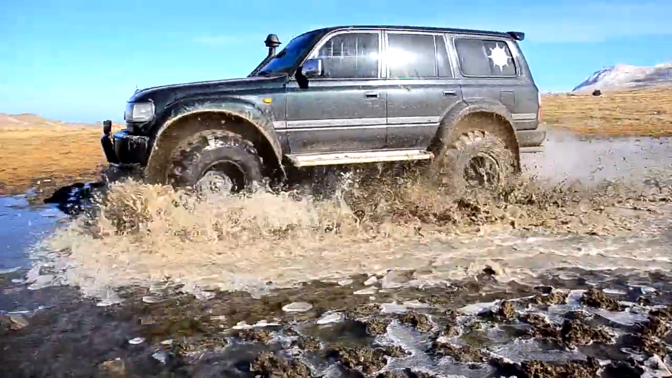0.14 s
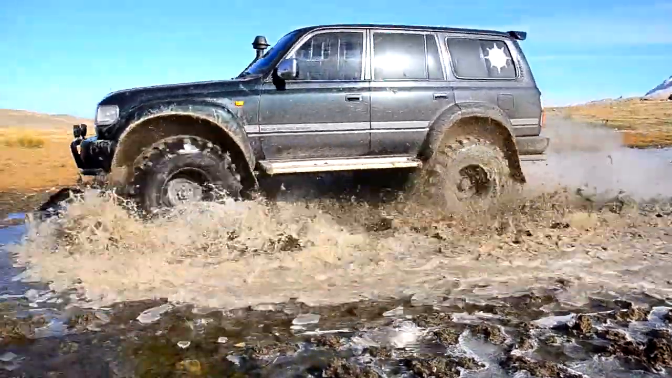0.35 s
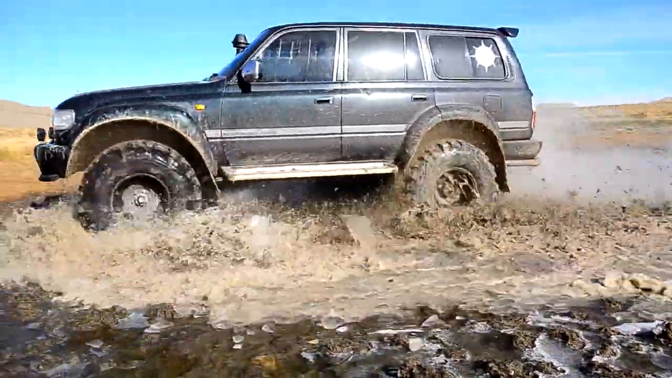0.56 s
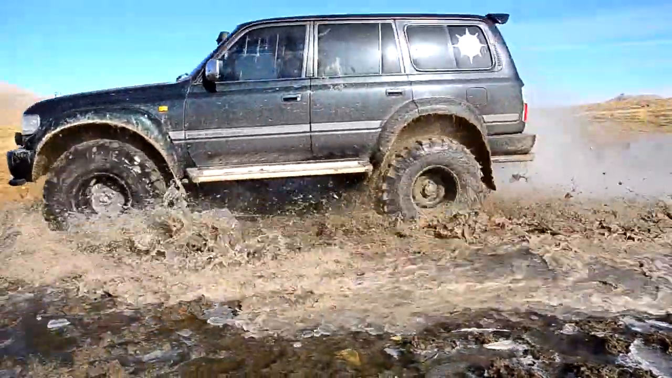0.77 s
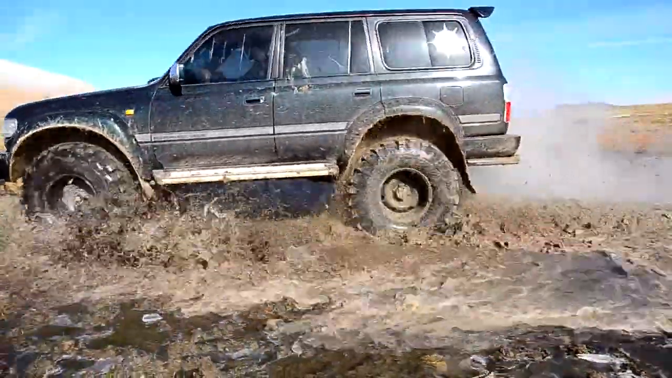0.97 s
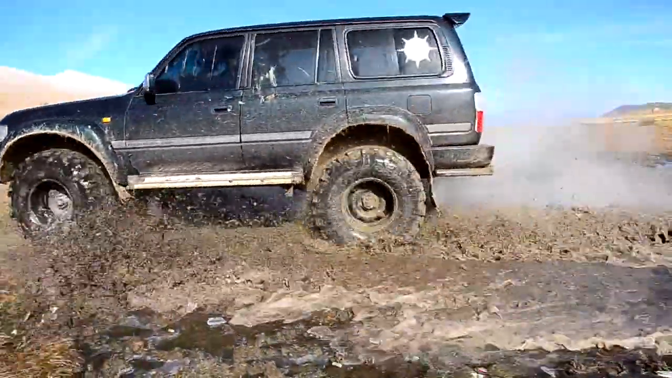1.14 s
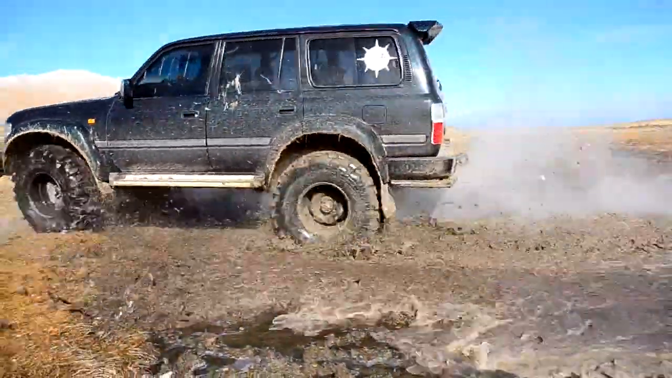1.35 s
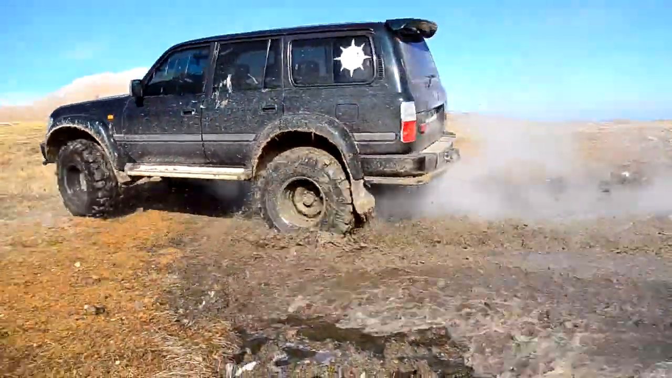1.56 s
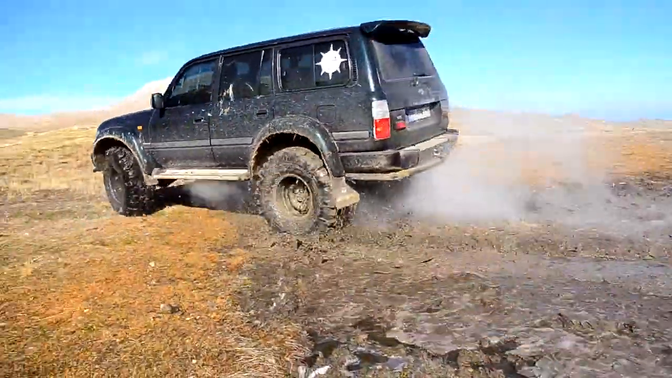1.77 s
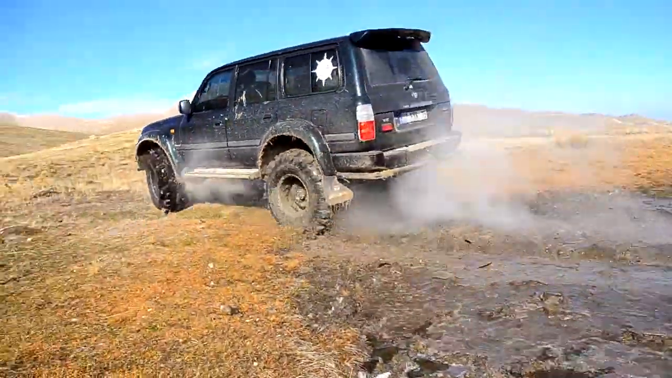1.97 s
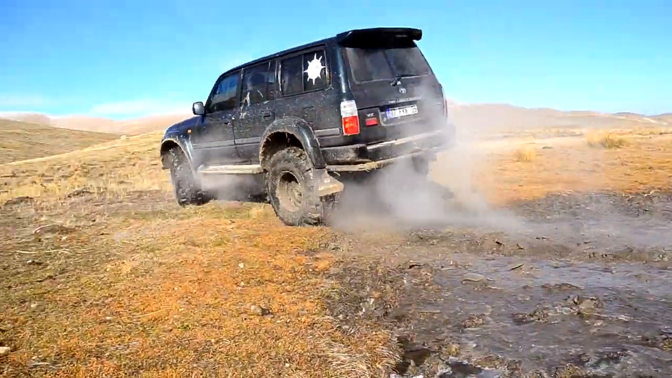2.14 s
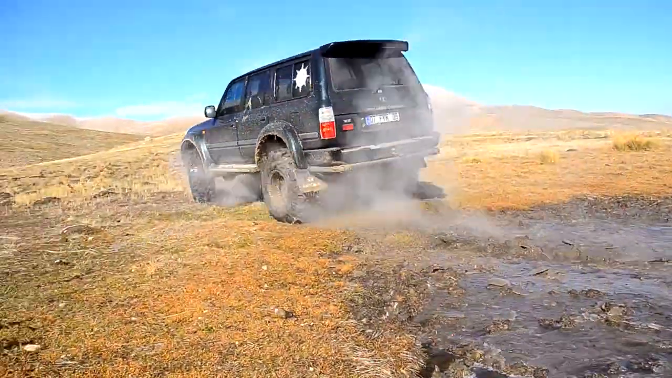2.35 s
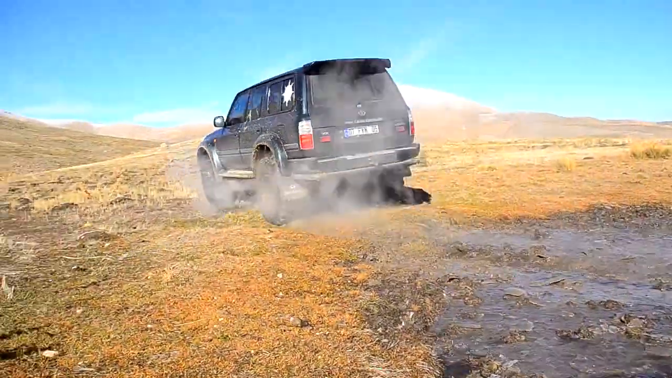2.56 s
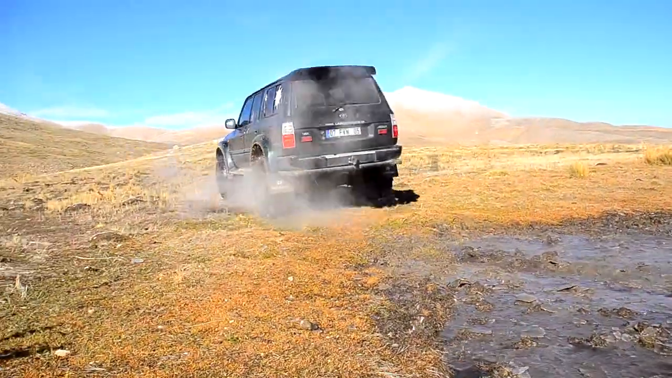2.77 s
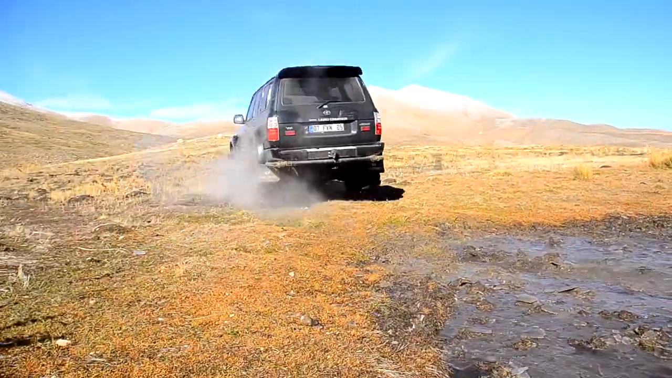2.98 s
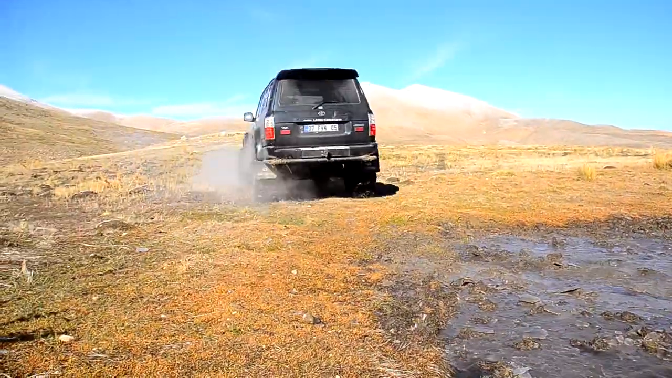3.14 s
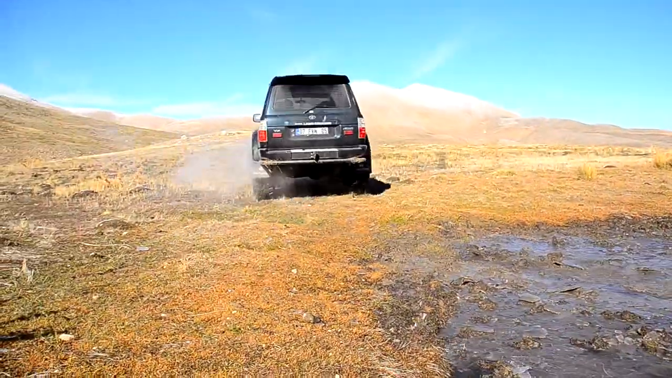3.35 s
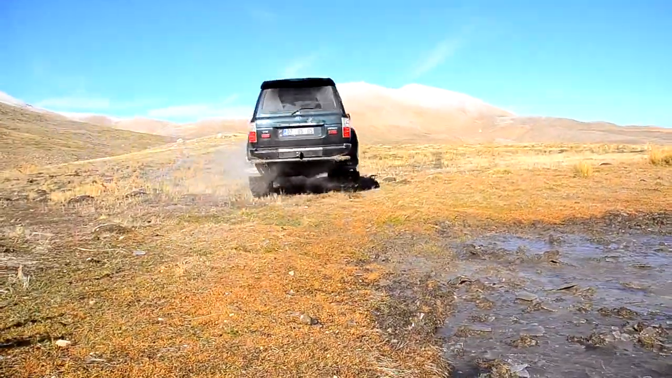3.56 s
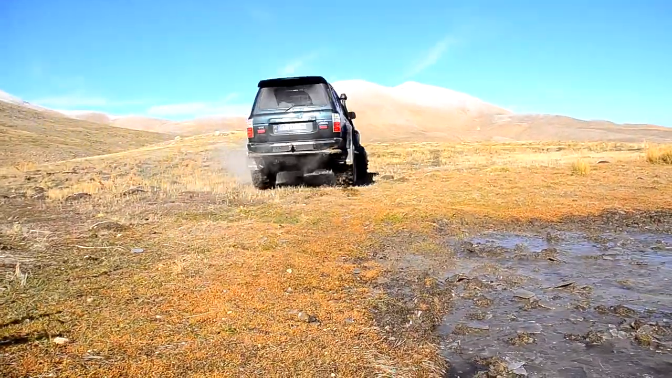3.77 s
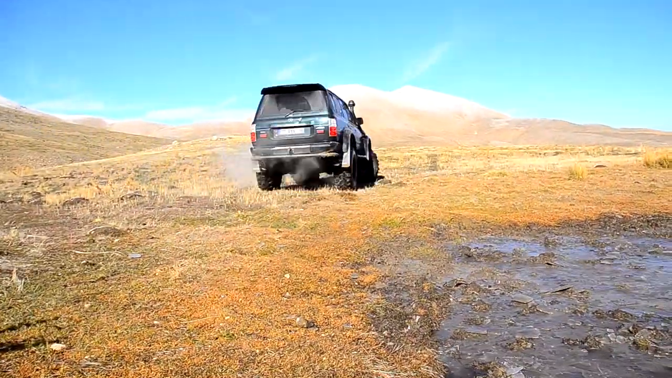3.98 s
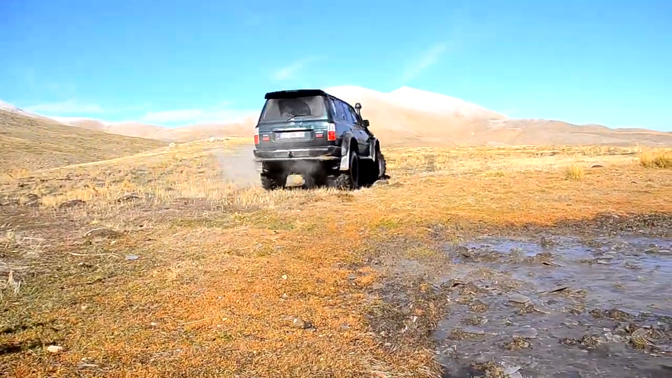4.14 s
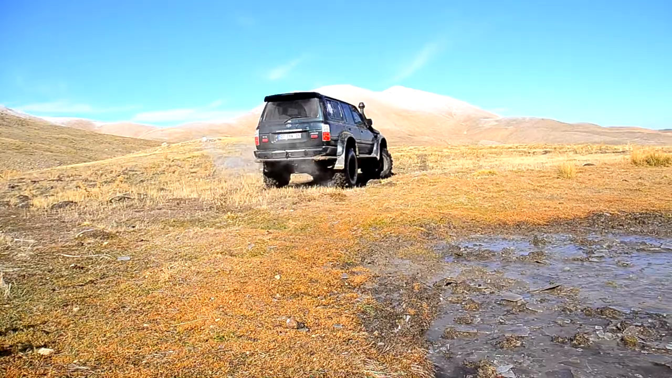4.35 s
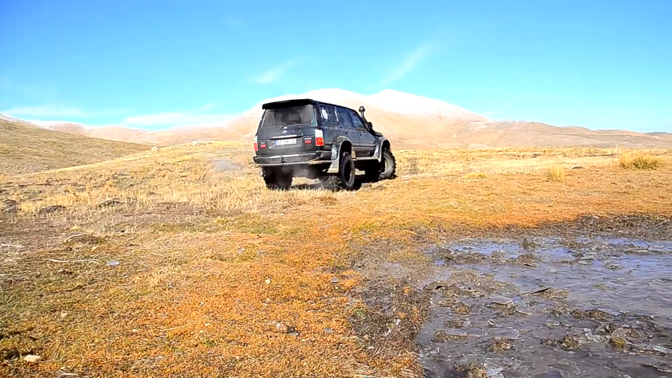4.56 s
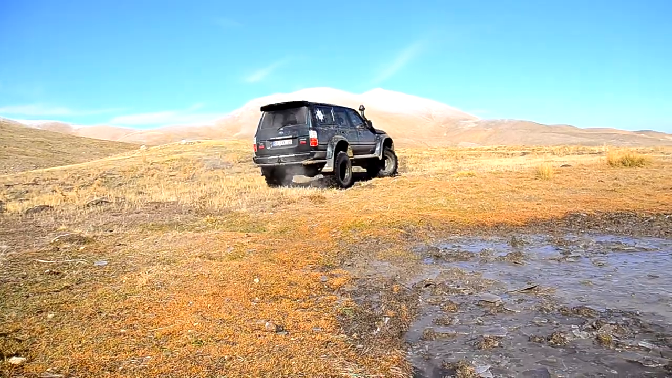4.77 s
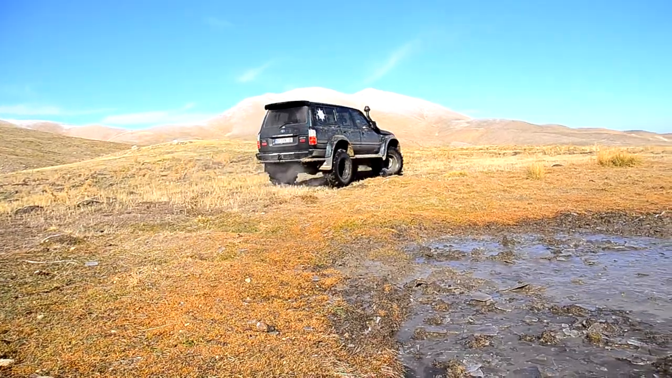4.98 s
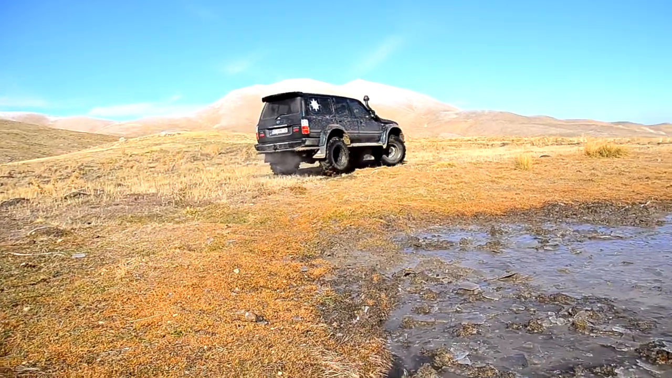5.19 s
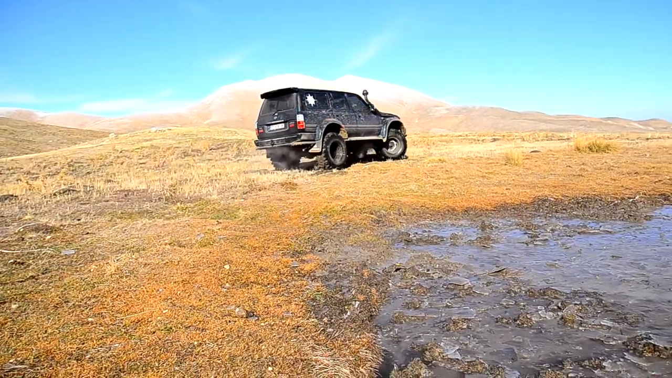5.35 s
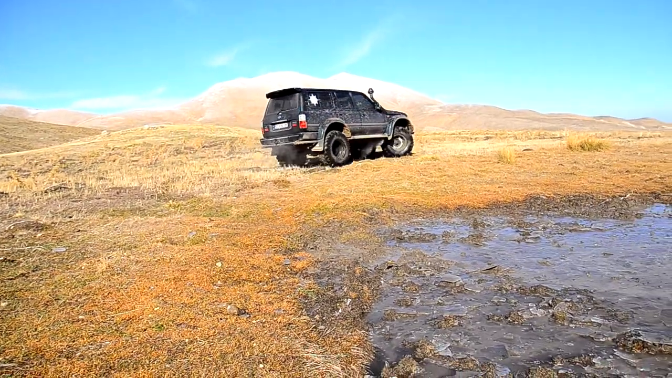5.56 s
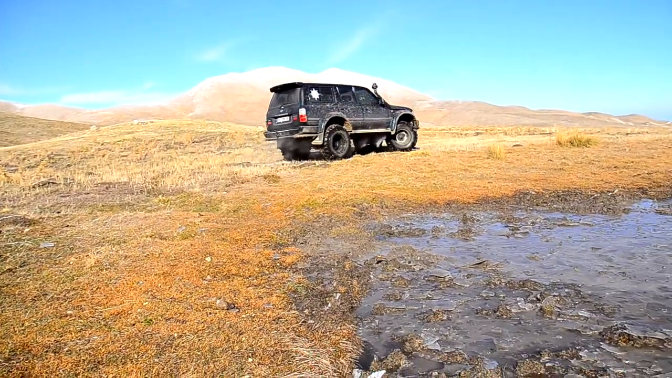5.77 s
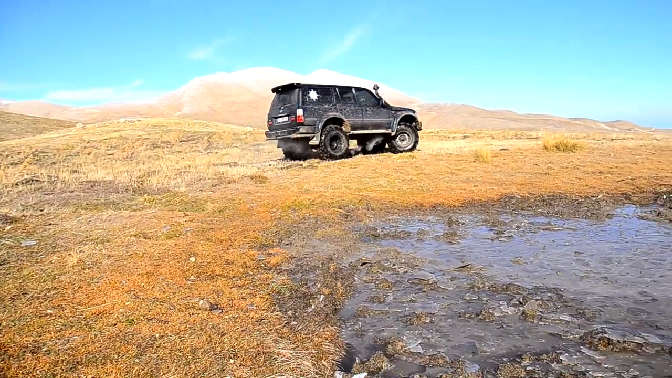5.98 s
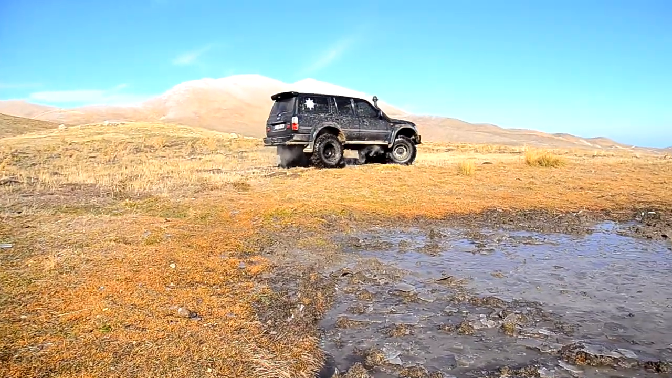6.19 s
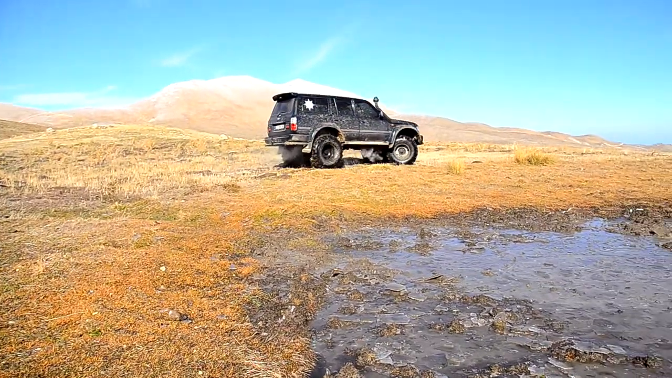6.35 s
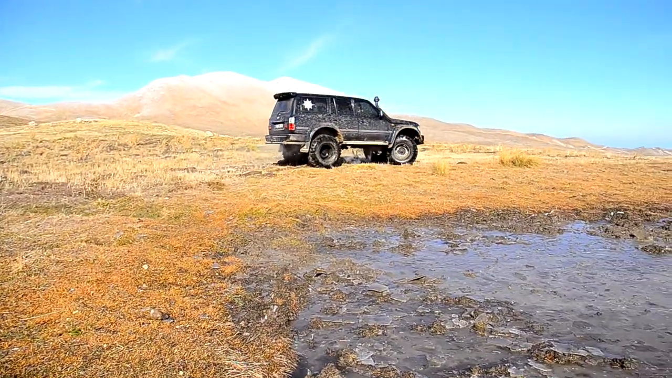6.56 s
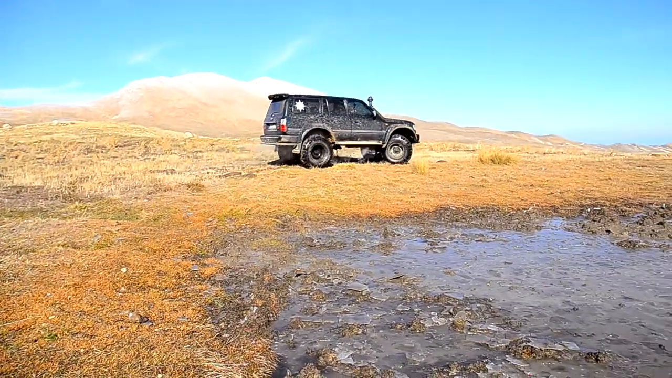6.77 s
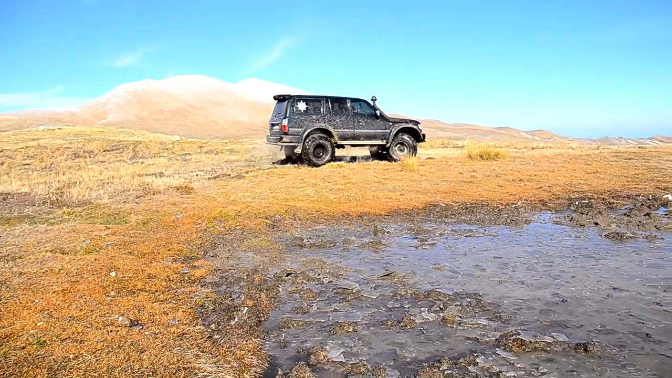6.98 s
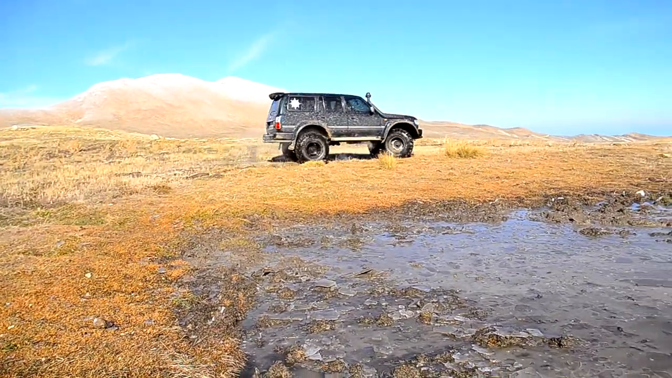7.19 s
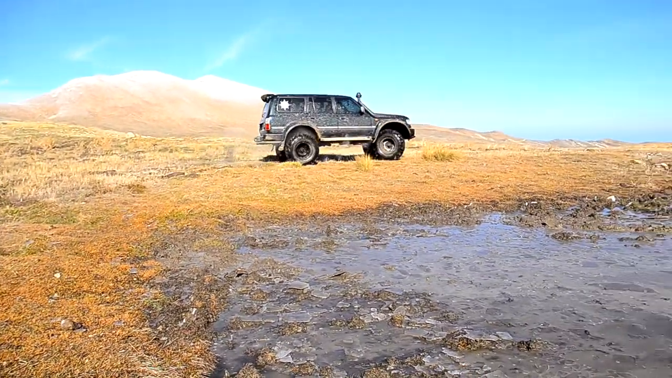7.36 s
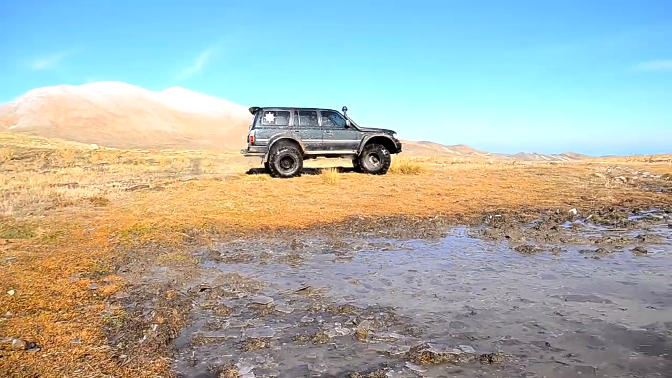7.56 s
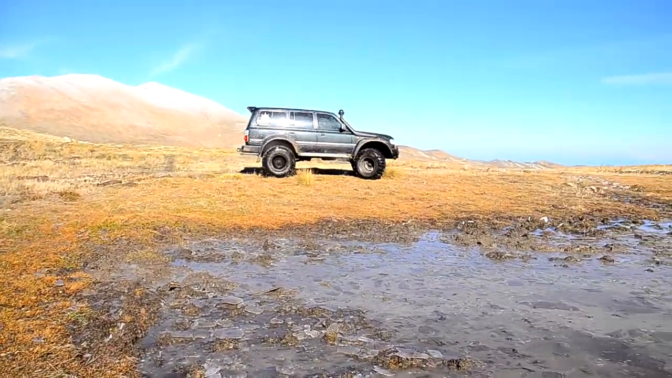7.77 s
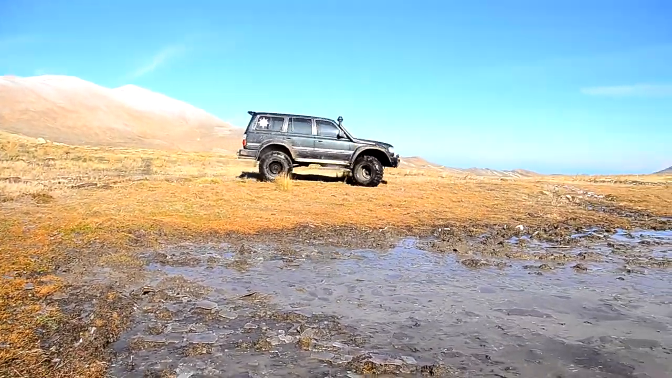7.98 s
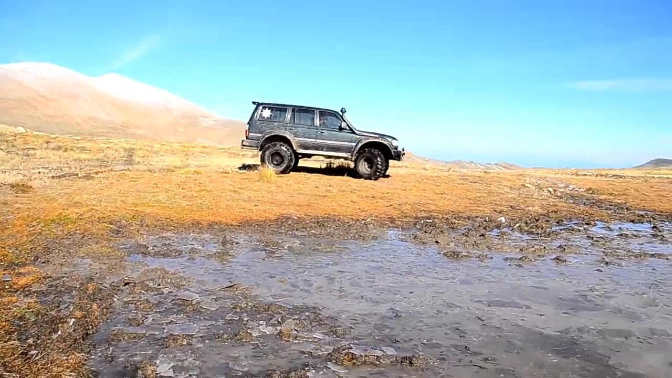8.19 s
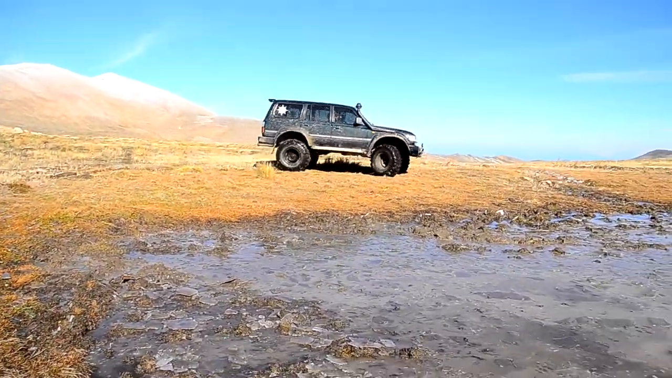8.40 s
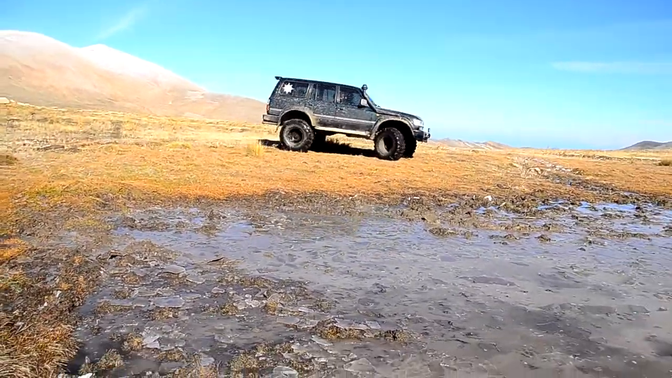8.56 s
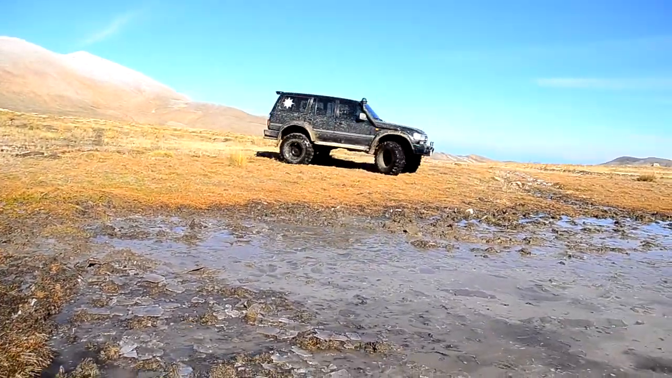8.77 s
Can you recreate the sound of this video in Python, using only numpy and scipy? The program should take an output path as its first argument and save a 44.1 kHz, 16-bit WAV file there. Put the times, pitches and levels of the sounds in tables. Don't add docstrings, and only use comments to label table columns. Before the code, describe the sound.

Very close, overloaded sound of a high-revving off-road engine and wheels flinging muddy water, with a raspy exhaust tone breaking through early. The revs fall as it drives off, then two short blips bark and stumble. Farther away it mutters low, almost idling, then revs up moderately again. Open air, dry microphone, low wind bumps and small stone clicks.

```python
import sys
import numpy as np
from scipy import signal
from scipy.fft import rfft, irfft, next_fast_len
from scipy.io import wavfile
from scipy.ndimage import uniform_filter1d, map_coordinates

SR = 44100
rng = np.random.default_rng(int(sys.argv[2]) if len(sys.argv) > 2 else 0)


def unload_audio(sound):
    columns = np.transpose(np.atleast_2d(sound))
    steps = np.round(np.clip(columns, -1, 1) * 32767)
    wavfile.write(sys.argv[1], SR, steps.astype(np.int16))


def magnitude_from_level(level_db):
    exponent = np.asarray(level_db, float) / 20
    return 10 ** exponent


N = 389403


def unit(x):
    return x / np.sqrt(np.mean(x ** 2) + 1e-20)


def along(points, hz):
    table_hz, value = np.transpose(points)
    return np.interp(np.log(hz + 1), np.log(table_hz + 1), value)


def curves(rows):
    time_s, *columns = np.transpose(rows)
    return [np.interp(np.arange(N) / SR, time_s, column) for column in columns]


def bump(centre_s, half_s):
    return np.exp(-((np.arange(N) / SR - centre_s) / half_s) ** 2)


def wobble(rate_hz):
    knots = rng.standard_normal(int(N * rate_hz / SR) + 4)
    return map_coordinates(knots, [np.arange(N) * rate_hz / SR])


def filtered(x, response):
    size = next_fast_len(N + SR // 2)
    return irfft(rfft(x, size) * response(np.fft.rfftfreq(size, 1 / SR)), size)[:N]


def coloured(x, spectrum):
    return unit(filtered(x, lambda hz: magnitude_from_level(along(spectrum, hz))))


def patchy(depth_db):
    z = signal.stft(rng.standard_normal(N), nperseg=512)[2]
    field = uniform_filter1d(rng.standard_normal(z.shape), 6, 0)
    field = uniform_filter1d(field, 8, 1)
    return signal.istft(z * magnitude_from_level(depth_db * unit(field)), nperseg=512)[1][:N]


def layer(gains_db, pedal, near):
    base_db, throttle_db, near_db = gains_db
    return base_db + throttle_db * pedal + near_db * near


def clear_of_water():
    return bump(0.68, 0.17)


PASSING_SWELLS = {"3": [(2.22, .1, 7.5), (8.1, .35, -5)], "6": [(2.5, .1, 6.5), (3.1, .1, 8.5),
                  (7.95, 0.41, -7)], "9": [(1.72, 0.11, 6.5)], "12": [(2.25, .1, 6), (2.47, 0.11, -5.5),
                  (2.68, 0.07, 4), (7.68, 0.096, -8.5), (8.0, 0.13, 4), (8.6, 0.071, -7)],
                  "15": [(0.151, .2, 9.5), (7.4, 0.34, 7), (8.8, 0.17, 11)], "18": [(3.11, 0.049, 8)],
                  "tailpipe": [(.66, .12, 8), (4.2, .7, -4), (7.0, 0.24, 8.5), (8.2, 0.34, -12)],
                  "rasp": [(.15, .15, 8), (2.22, 0.11, 9), (6.75, 0.17, -11), (7.8, 0.087, 9),
                  (8.3, 0.58, 6.5)], "uneven": [(.8, 0.045, 15), (1.82, .06, 8), (5.5, 0.69, 2)],
                  "roar": [(2.2, .12, 8), (3.25, 0.29, 4)]}


def swell(part):
    return sum(gain_db * bump(s, half_s) for s, half_s, gain_db in PASSING_SWELLS[part])


# start_s (centre), half_length_s, level_db
WIND_PUFFS = [(0.103, 0.47, -41), (0.803, .1, -32.5), (1.387, 0.79, -33.5), (2.2, 0.22, -33.5),
              (2.7, 0.18, -25), (3.2, 0.29, -40), (3.732, 0.15, -35), (4.5, 0.56, -43), (7.05, 0.33, -47.5),
              (7.807, .1, -37), (8.7, .2, -46)]
# pitch_hz, level_db
BUFFET_COLOUR = [(10, -15.5), (25, -8.5), (60, 1), (150, -9), (300, -12), (600, -56.5)]


def wind():
    calm = magnitude_from_level(-61)
    level = calm + sum(magnitude_from_level(db) * bump(s, half_s) for s, half_s, db in WIND_PUFFS)
    rumble = coloured(rng.standard_normal(N), BUFFET_COLOUR)
    return level * unit(magnitude_from_level(4.5 * wobble(9.7)) * rumble)


# start_s, level_db (peak), pitch_hz
SNAPS = [(2.539, -17.5, 4250), (2.745, -22, 3200), (2.869, -16.5, 2980), (2.972, -28, 6730),
         (3.061, -10.5, 1480), (4.616, -28, 3800), (4.874, -33, 3650), (5.27, -25.5, 4170),
         (6.257, -22.5, 6400), (6.349, -41, 8560), (7.449, -36.5, 10600), (7.715, -12.5, 3580),
         (8.803, -33.5, 11000), (8.818, -32.5, 11000)]


def ticks():
    out = np.zeros(N + SR)
    t = np.arange(SR // 50) / SR
    for start_s, db, hz in SNAPS:
        band = signal.butter(2, [.65 * hz, min(1.3 * hz, SR / 2.2)], "band", fs=SR)
        fade = magnitude_from_level(db + 1.5 - 60 * t / .022)
        start = round(start_s * SR)
        out[start:start + len(t)] += signal.lfilter(*band, fade * rng.standard_normal(len(t)))
    return out[:N]


# start_s (centre), half_length_s, pitch_hz, level_db
SQUEAK_TIMES = [(7.436, .03, 1350, -38), (7.702, 0.035, 1276, -31.5), (7.92, 0.19, 3300, -49)]


def squeaks():
    t = np.arange(N) / SR
    out = np.zeros(N)
    for s, half_s, hz, db in SQUEAK_TIMES:
        level = magnitude_from_level(db + 8.8 * wobble(40)) * bump(s, half_s)
        out += level * np.sin(2 * np.pi * hz * t + 2.4 * wobble(30))
    return out


# start_s, level_db
MUD_LEVEL = [(0, 1), (.1, -3.5), (.65, 0.5), (1.1, -5), (1.5, -10.5), (1.7, -13), (2.0, -21.5),
             (2.25, -20.5), (2.4, -27)]
# pitch_hz, level_db
SPRAY_COLOUR = [(240, -36.5), (400, -6.5), (586, -27), (683, -6), (772, 0), (1360, -1), (1960, -9),
                (3560, -8.5), (5730, -21), (8930, -18), (15500, -42)]


def mud():
    (level_db,) = curves(MUD_LEVEL + [(2.75, -61)])
    hits = rng.random(N) < .03
    drops = hits * rng.standard_normal(N) * magnitude_from_level(2.5 * rng.exponential(size=N))
    clumps = unit(drops * magnitude_from_level(5.1 * wobble(34.0)))
    wash = clumps * 0.3 + patchy(2.9)
    return magnitude_from_level(level_db - 4 - 3 * clear_of_water()) * coloured(wash, SPRAY_COLOUR)


def puff(turns, depth):
    firing = np.cos(2 * np.pi * 6 * turns)
    cycle = np.cos(2 * np.pi * turns)
    return 1 + depth * firing + .5 * depth * cycle


# pitch_hz, level_db
HISS_COLOUR = [(2940, -30), (5000, -6), (5610, -6), (6010, -7), (7950, -6.5), (9600, -13.5), (10500, -22.5),
               (15000, -50.5)]


def intake_hiss(turns, level_db):
    return magnitude_from_level(level_db - 3.5) * coloured(puff(turns, 0.2) * patchy(1.9), HISS_COLOUR)


# pitch_hz, width_hz, level_db
BLOCK_RESONANCES = [(1155, 312, 4.5), (1530, 403, 4), (2870, 1100, -3.5), (3450, 535, -1),
                    (4190, 630, -6.5)]


def block_ring(hz):
    ring = 0
    for k, (centre_hz, width_hz, db) in enumerate(BLOCK_RESONANCES):
        push = 1j * hz * width_hz
        ring = ring + (-1) ** k * magnitude_from_level(db) * push / (centre_hz ** 2 - hz ** 2 + push)
    return ring * hz ** 2 / (hz ** 2 + 900 ** 2) / (1 + (hz / 7000) ** 4)


def block_clatter(turns, level_db):
    knocks = puff(turns, 0.1) * patchy(0.53)
    return magnitude_from_level(level_db - 2.5 - 1.1 * clear_of_water()) * unit(filtered(knocks, block_ring))


# pitch_hz, level_db
ROAR_COLOUR = [(60, -120), (90, -2), (200, 5.5), (350, 4.5), (600, -0.5), (830, -5), (950, -13.5),
               (3000, -53.5)]


def gas_roar(turns, level_db):
    gas = puff(turns, 0.097) * patchy(1.8)
    return magnitude_from_level(level_db + 1.0 - 1.1 * clear_of_water()) * coloured(gas, ROAR_COLOUR)


# start_s, level_db
BODY_LEVEL = [(0, -9), (.73, -11), (1.4, -14.5), (2.04, -22.5), (2.24, -29), (2.4, -27), (2.95, -31.5),
              (3.2, -28.5), (3.69, -33.5), (4.65, -35.5), (6.5, -33), (6.65, -30.5), (7.28, -28),
              (8.07, -30.5), (8.68, -27), (8.83, -22.5)]


def machinery(turns, pedal, near):
    (body_db,) = curves(BODY_LEVEL)
    shake = wobble(17)
    roar_db = body_db + layer((-2, 6, 0), pedal, near) + swell("roar")
    hiss_db = 1.514 * body_db + layer((2.5, 3.5, -7.5), pedal, near)
    roar = gas_roar(turns, roar_db)
    clatter = block_clatter(turns, body_db + 0.48 * shake)
    return roar + clatter + intake_hiss(turns, hiss_db + 0.25 * shake)


def order(k, turns, db, sway):
    level = np.sqrt(2) * magnitude_from_level(db + sway * wobble(8))
    return level * np.sin(2 * np.pi * k * turns - .17 * k * k + .15 * sway * wobble(6))


def stack(orders, turns, cycle_hz, level_db, pipe):
    colour_db = along(pipe, np.array(orders)[:, None] * cycle_hz[::64])
    colour_db -= 10 * np.log10(np.sum(magnitude_from_level(2 * colour_db), axis=0))
    return sum(order(k, turns, level_db + np.repeat(db, 64)[:N], sway=1.3)
               for k, db in zip(orders, colour_db))


# pitch_hz, level_db
SILENCER_COLOUR = [(90, -50.5), (140, -15.5), (170, -20.5), (195, -9.5), (215, 0), (235, -11.5), (258, -21),
                   (290, -29), (340, -9), (385, -31), (620, -22), (1000, -35)]


def uneven_firing(turns, cycle_hz, pedal, near):
    level_db = layer((-18.5, -20, 11), pedal, near) + swell("uneven") - 2.5
    between = [k for k in range(4, 33) if k % 3]
    return sum(order(k, turns, level_db + along(SILENCER_COLOUR, k * cycle_hz), sway=2.2)
               for k in between)


# pitch_hz, level_db
RASP_COLOUR = [(440, 20), (520, -30), (615, 11.5), (680, -12), (790, -5.5), (900, -23), (1020, -21.5),
               (1300, -6), (1475, 4.5), (1650, -23.5)]


def rasp(turns, cycle_hz, pedal, near):
    level_db = layer((-47.5, 15, 25.5), pedal, near) + swell("rasp") + 21 * clear_of_water()
    return stack(range(27, 46, 3), turns, cycle_hz, level_db, RASP_COLOUR)


# pitch_hz, level_db
TAILPIPE_COLOUR = [(280, -10.5), (340, -0.5), (390, -7), (440, 12.5), (500, 1), (900, -17)]


def tailpipe(turns, cycle_hz, pedal, near):
    level_db = layer((-40, 13.5, 29.5), pedal, near) + swell("tailpipe")
    return stack((21, 24), turns, cycle_hz, level_db, TAILPIPE_COLOUR)


# start_s, level_db (added to odd orders)
GROUP_IMBALANCE = [(0.0, 7), (0.28, 3), (0.44, 1), (0.6, 13), (1.03, 7.5), (1.36, 0.5), (1.54, 4.5),
                   (1.83, 5.1), (1.96, -2), (2.22, 7), (2.45, -4), (3.28, -4.5), (3.6, -4.9), (4.8, -2.5),
                   (5.8, 6.5), (6.71, 3), (7.5, -3.5), (8.83, -6.5)]
# pitch_hz, level_db
PIPE_COLOUR = [(44.0, -61.8), (105.0, -23), (143.0, 4.5), (185.0, 3.5), (198.0, 14.1), (219.0, 13),
               (254.0, 2.25), (313.0, 10.5)]
# multiple of the cycle, level_db, full_throttle_gain_db, close_by_gain_db
LOW_TONES = [(3, 5, 3, -13.5), (6, -8, -13, 9), (9, -40.5, 5.5, 21), (12, -20.5, -15, 3),
             (15, -42.5, 3.5, 11.5), (18, -53, 26.5, 30.5)]


def low_orders(turns, cycle_hz, pedal, near):
    (odd_db,) = curves(GROUP_IMBALANCE)
    tone = np.zeros(N)
    for k, *gains_db in LOW_TONES:
        level_db = layer(gains_db, pedal, near) + along(PIPE_COLOUR, k * cycle_hz)
        level_db = level_db + k % 2 * odd_db + swell(str(k))
        tone += order(k, turns, level_db, sway=1.0)
    return tone


# start_s, level_db
OUTLET_FACING = [(0.03, -3.5), (0.5, -11.5), (0.84, -14.5), (1.3, -2), (1.73, 8.5), (1.92, -3), (2.14, 14),
                 (2.37, 2), (2.82, 2.3), (3.16, 9), (3.47, 6.5), (3.88, 1.9), (6.5, 0.3), (7.02, 4.5),
                 (7.66, 3.4), (8.0, 1.7), (8.6, 3.5), (8.83, 8.5)]
# start_s (centre), half_length_s, depth_db
MISFIRES = [(2.875, .02, 9), (2.94, .015, 8), (3.475, .02, 9), (3.537, .011, 20)]


def exhaust(turns, cycle_hz, pedal, near):
    tone = low_orders(turns, cycle_hz, pedal, near) + tailpipe(turns, cycle_hz, pedal, near)
    tone += rasp(turns, cycle_hz, pedal, near) + uneven_firing(turns, cycle_hz, pedal, near)
    (outlet_db,) = curves(OUTLET_FACING)
    stumble_db = sum(depth_db * bump(s, half_s) for s, half_s, depth_db in MISFIRES)
    return -tone * magnitude_from_level(outlet_db - stumble_db)


# start_s, speed_hz (four-stroke cycles a second)
BASE_SPEED = [(0.0, 43.53), (0.29, 42.52), (0.56, 33.23), (1.19, 26.84), (1.39, 24.47), (1.78, 20.0),
              (2.95, 14.39), (3.8, 15.8), (4.68, 16.98), (5.05, 15.35), (5.84, 12.22), (6.46, 11.66),
              (6.74, 15.77), (7.3, 20.39), (7.68, 21), (7.87, 19.7), (8.55, 20.38), (8.83, 22.02)]
# start_s (centre), half_length_s,
# added_speed_hz
THROTTLE_STABS = [(0.69, 0.07, 0.4), (0.71, 0.27, 5.49), (2.28, 0.25, 6.21), (3.32, 0.29, 6.13),
                  (4.24, 0.22, 0.93), (5.47, 0.22, 1.37), (6.24, 0.53, 3.11)]


def engine_speed():
    (base_hz,) = curves(BASE_SPEED)
    return base_hz + sum(added_hz * bump(s, half_s) for s, half_s, added_hz in THROTTLE_STABS)


# start_s, opening (0-1)
PEDAL_OPENING = [(0.0, 0.08), (0.41, 0.31), (0.63, 0.76), (1.13, 0.09), (1.59, 0.52), (1.88, 0.05),
                 (2.24, 1), (2.41, 0.41), (2.96, 0.15), (3.12, 0.44), (3.41, 0.36), (3.69, 0.3),
                 (6.53, 0.26), (6.72, 0.82), (7.22, 0.4), (7.62, 0.46), (7.82, 0.26), (8.83, 0.64)]


def scene():
    cycle_hz = engine_speed()
    turns = np.cumsum(cycle_hz) / SR
    (pedal,) = curves(PEDAL_OPENING)
    leaves_s, leaving_s = 1.154, .25
    near = 1 / (1 + np.exp((np.arange(N) / SR - leaves_s) / leaving_s))
    truck = squeaks() + mud() + machinery(turns, pedal, near) + exhaust(turns, cycle_hz, pedal, near)
    overdrive = magnitude_from_level(1.5 * near)
    return (wind() + ticks() + overdrive * truck)[None]


# pitch_hz, width_hz, depth (0-1)
HOUSING_DIPS = [(5700, 160, 0.82), (6790, 70, 0.9)]


def microphone(x):
    def dips(hz):
        return np.prod([1 - depth / (1 + ((hz - c) / w) ** 2) for c, w, depth in HOUSING_DIPS], axis=0)
    ceiling, hardness = .77, 9
    x = filtered(x, dips)
    return x / (1 + np.abs(x / ceiling) ** hardness) ** (1 / hardness)


def low_pass(x):
    return signal.sosfilt(signal.butter(12, 15630, fs=SR, output="sos"), x)


def record(dry):
    mix = microphone(dry[0])[None]
    return low_pass(mix)


dry = scene()
out = record(dry)
unload_audio(out)
```